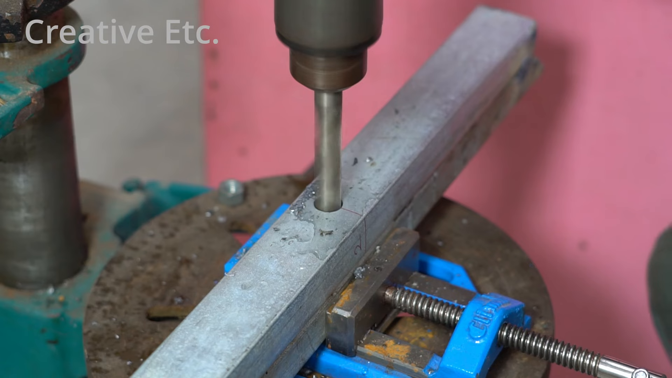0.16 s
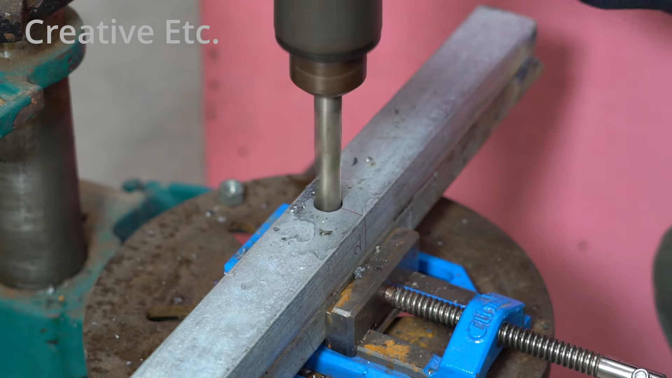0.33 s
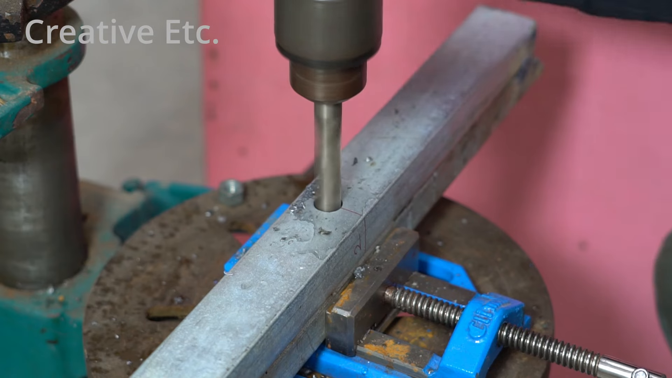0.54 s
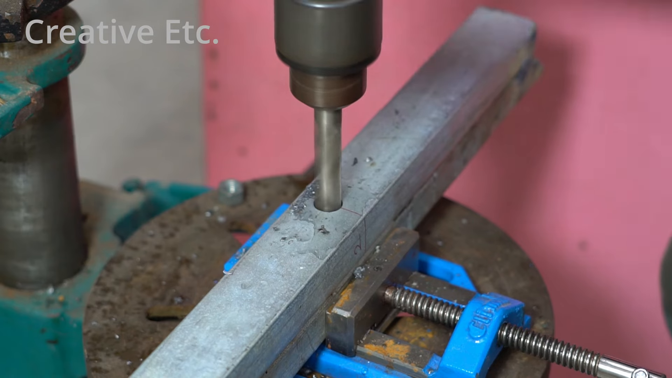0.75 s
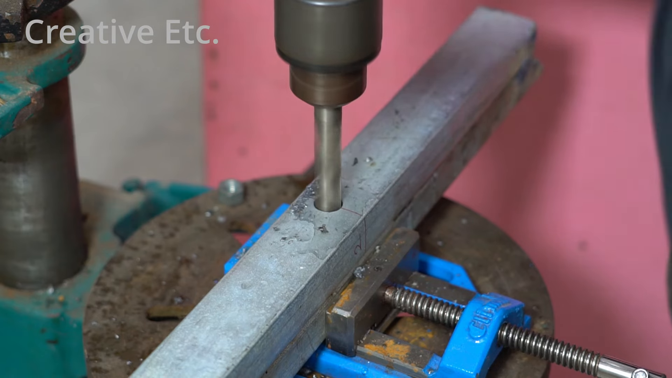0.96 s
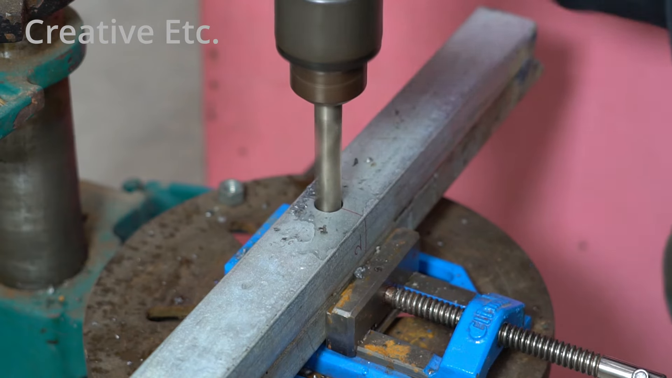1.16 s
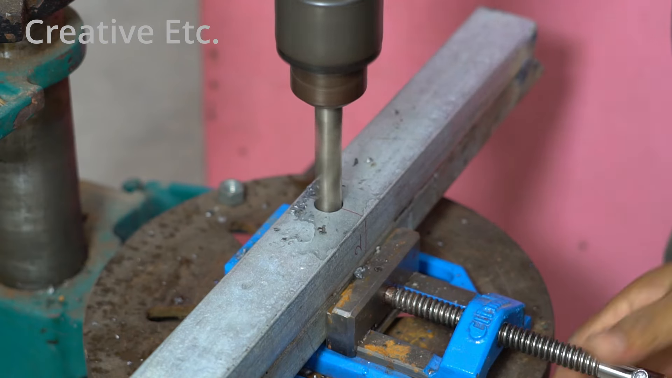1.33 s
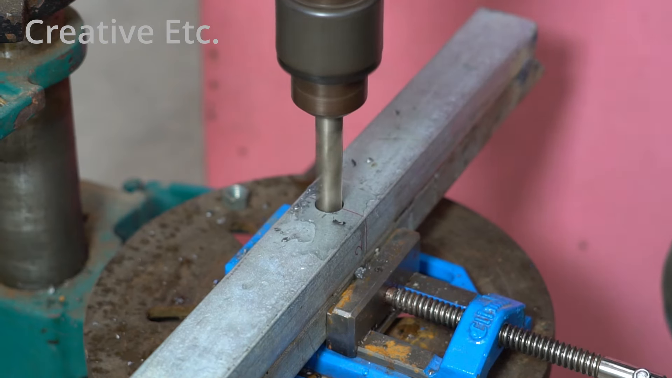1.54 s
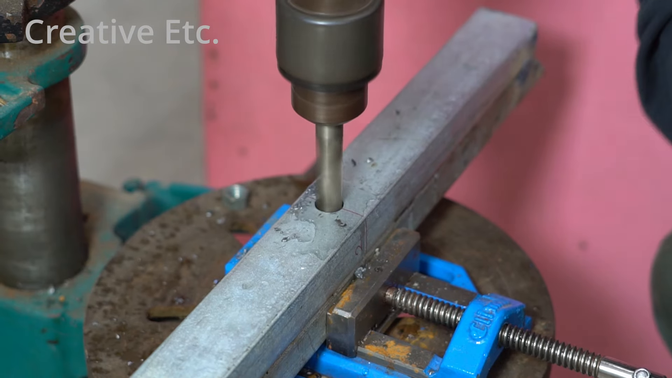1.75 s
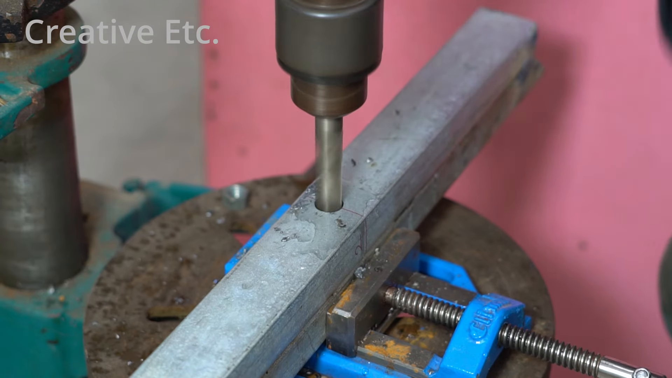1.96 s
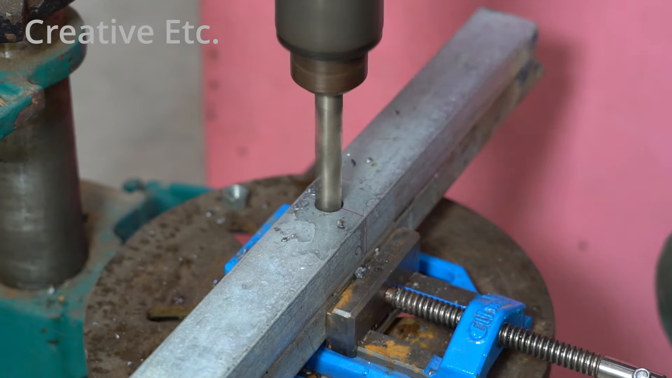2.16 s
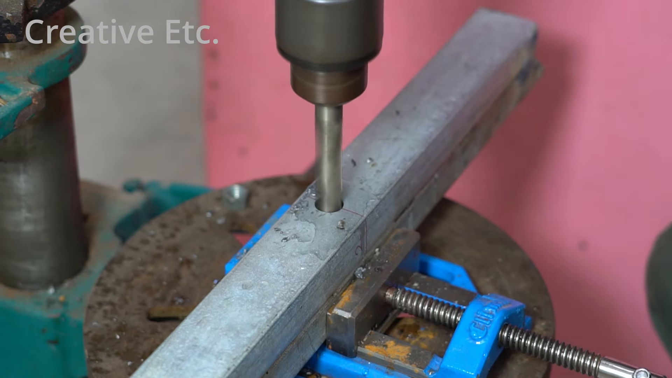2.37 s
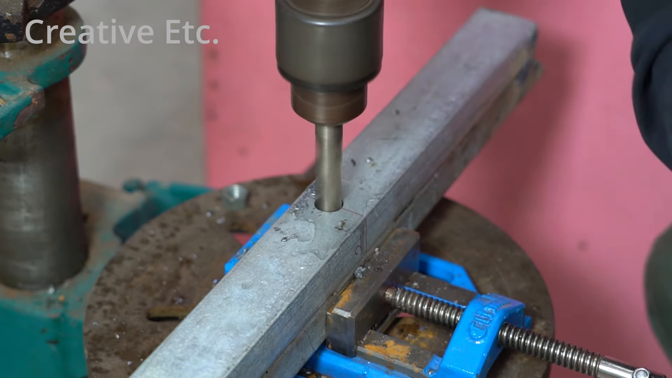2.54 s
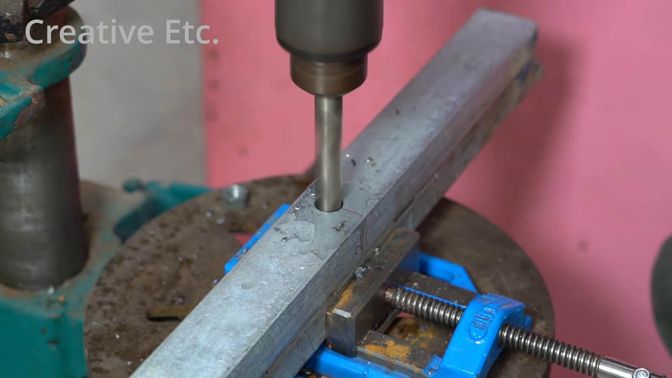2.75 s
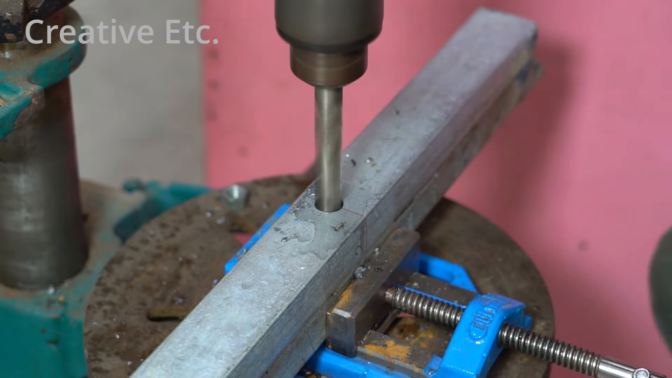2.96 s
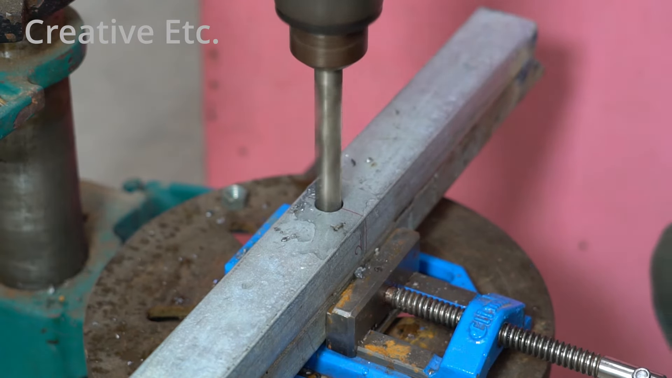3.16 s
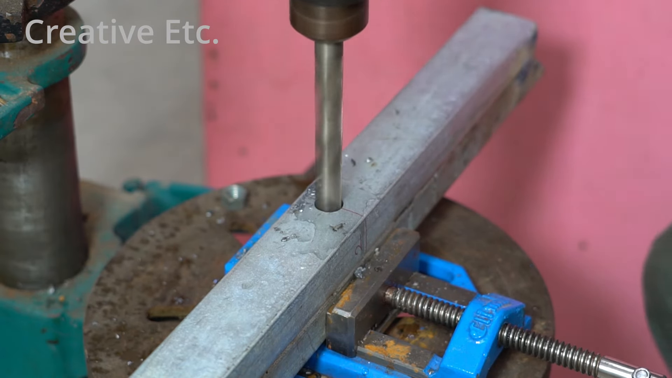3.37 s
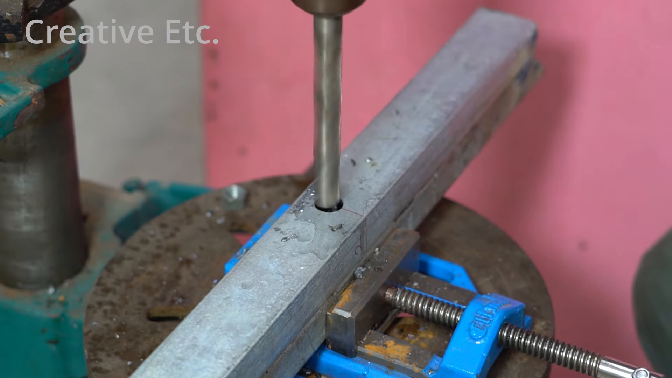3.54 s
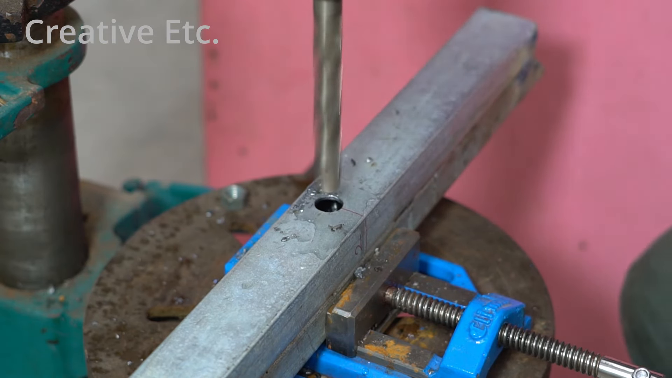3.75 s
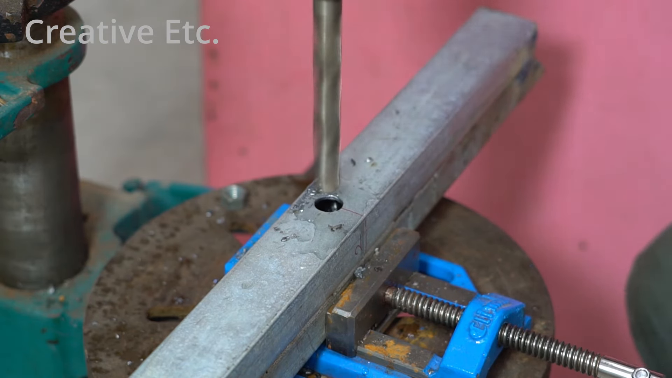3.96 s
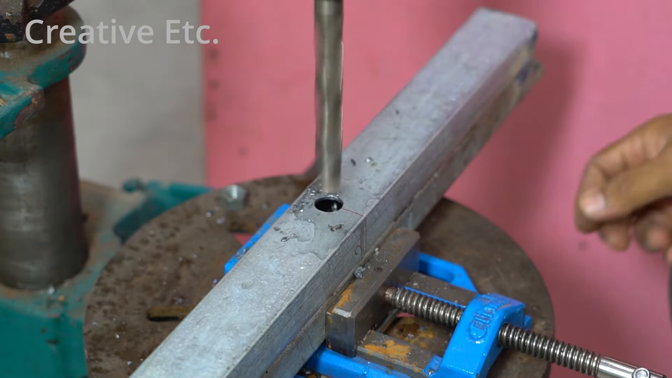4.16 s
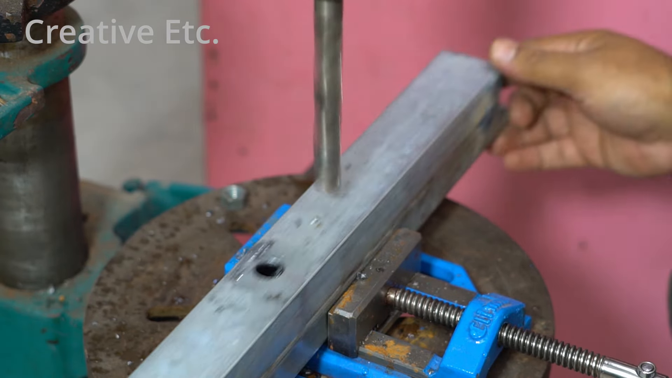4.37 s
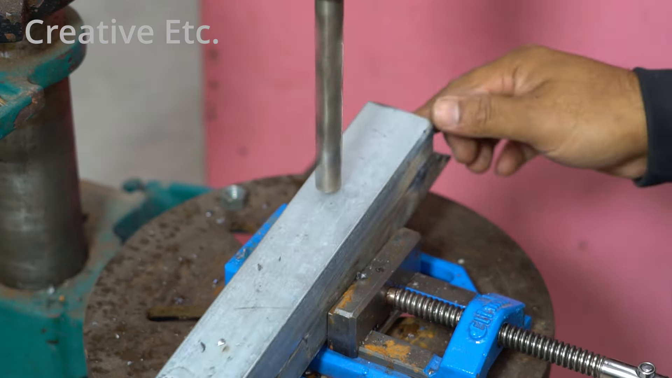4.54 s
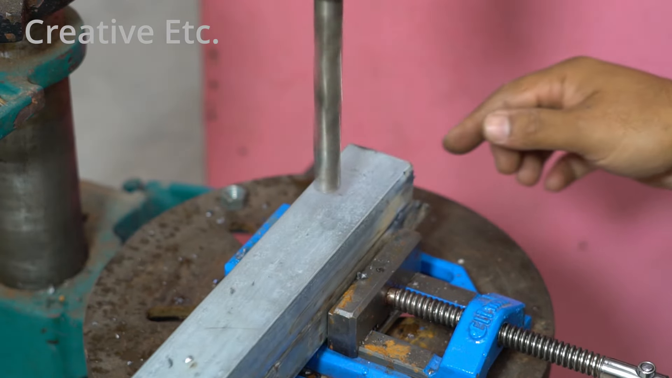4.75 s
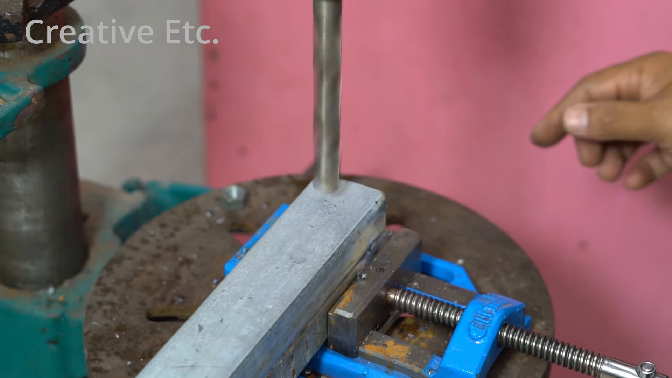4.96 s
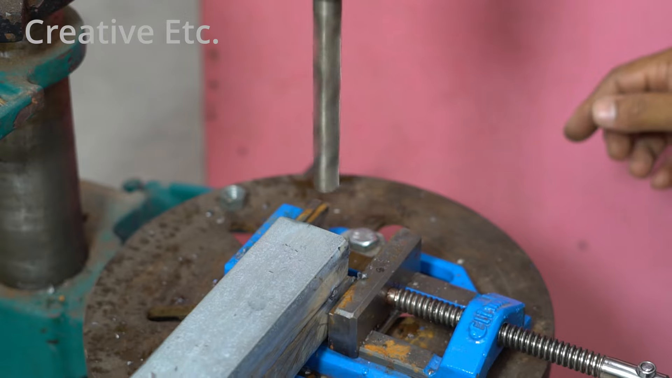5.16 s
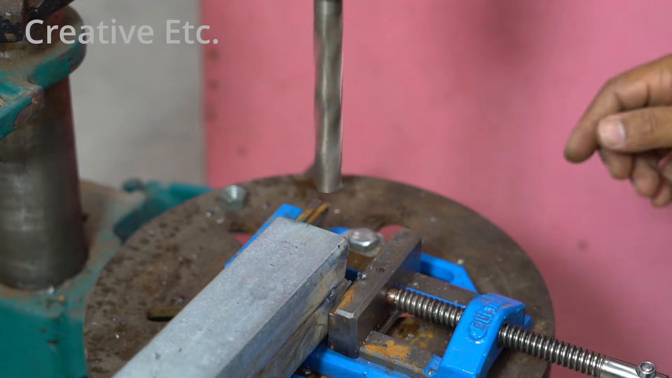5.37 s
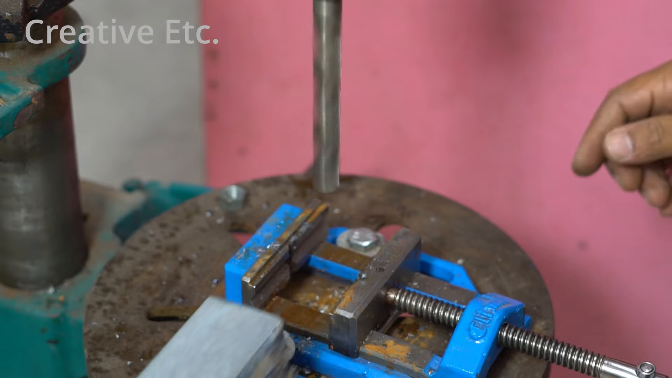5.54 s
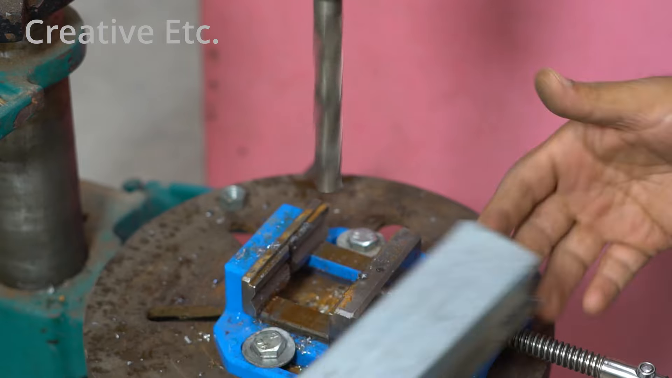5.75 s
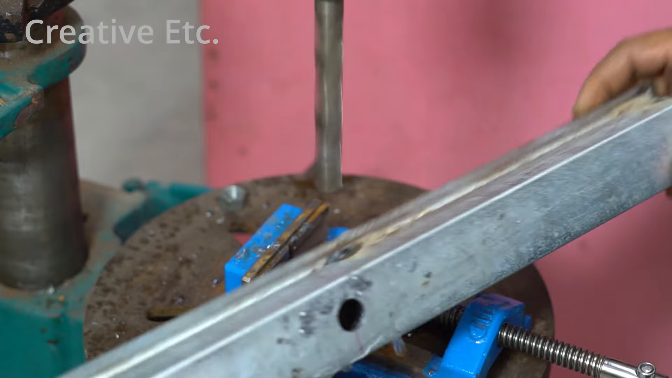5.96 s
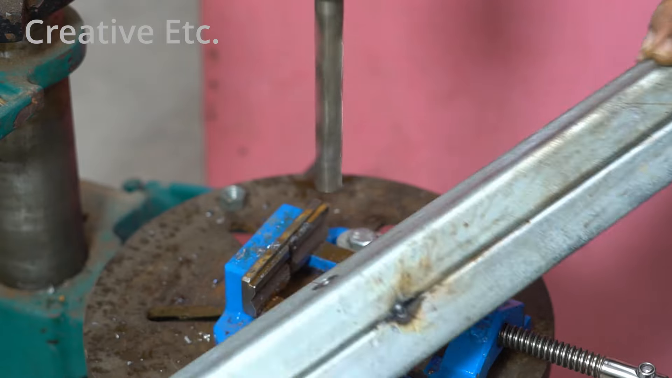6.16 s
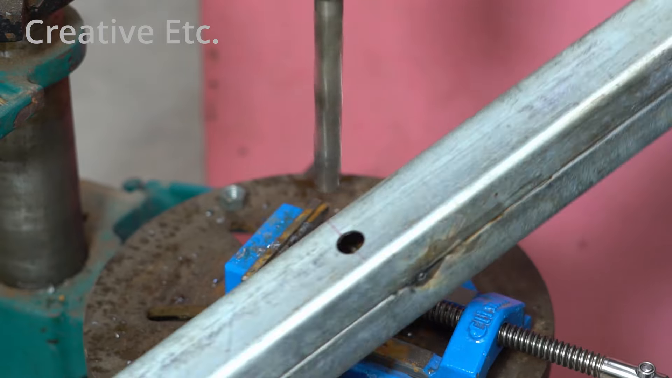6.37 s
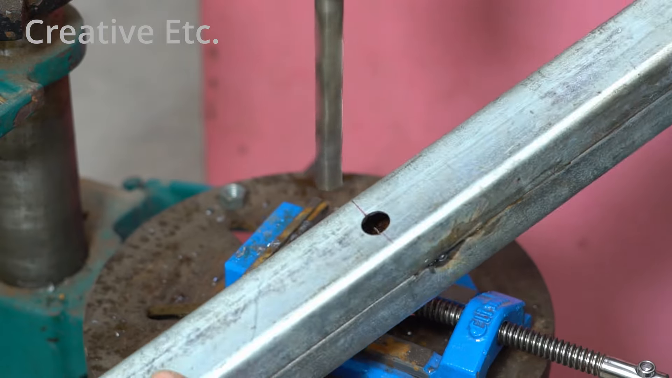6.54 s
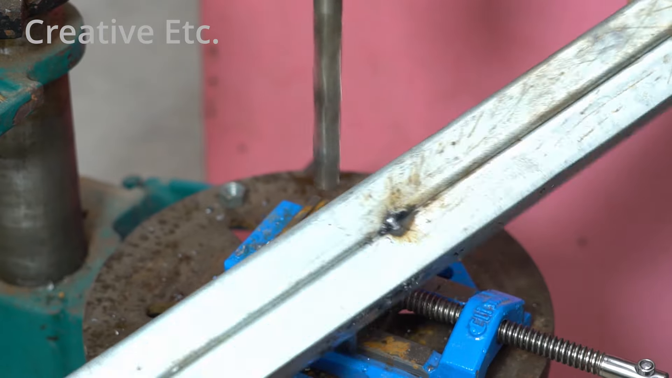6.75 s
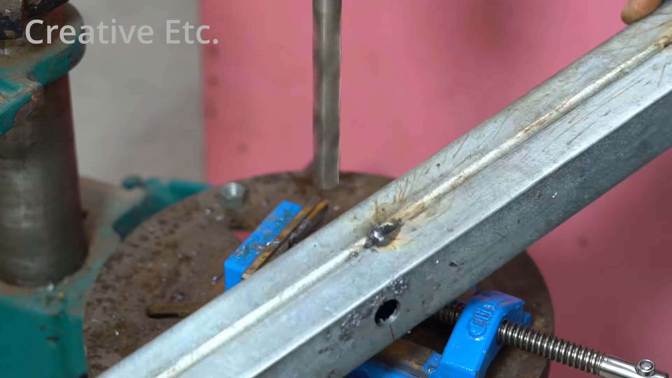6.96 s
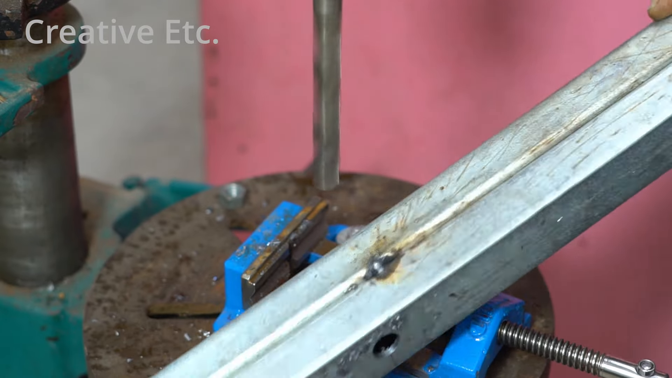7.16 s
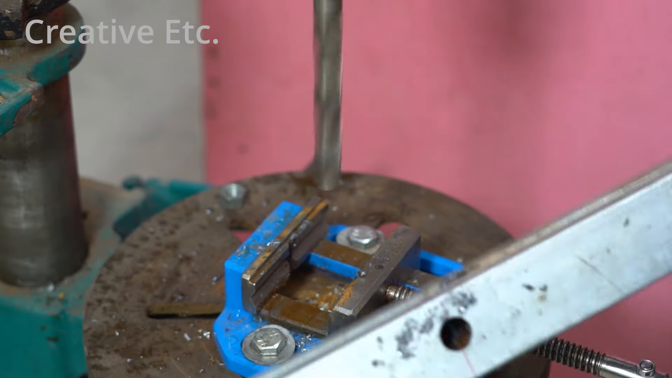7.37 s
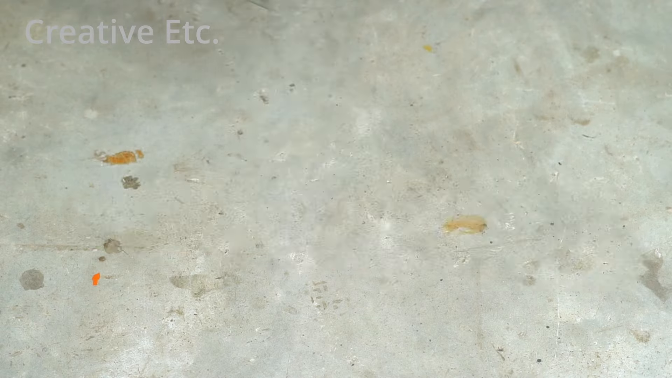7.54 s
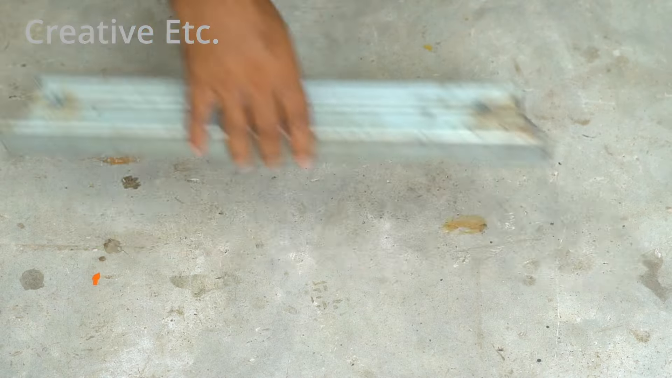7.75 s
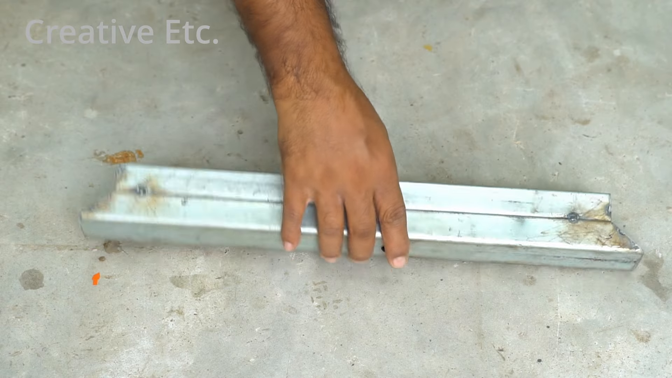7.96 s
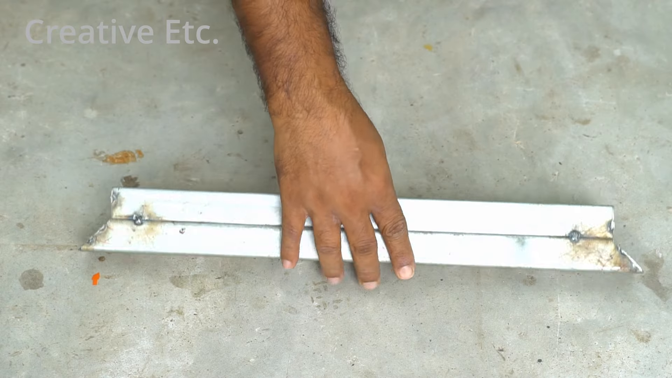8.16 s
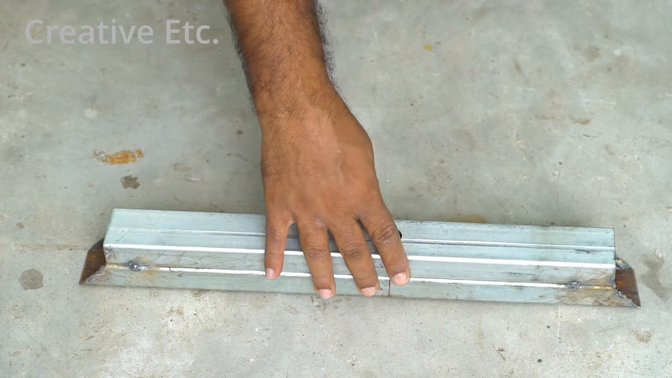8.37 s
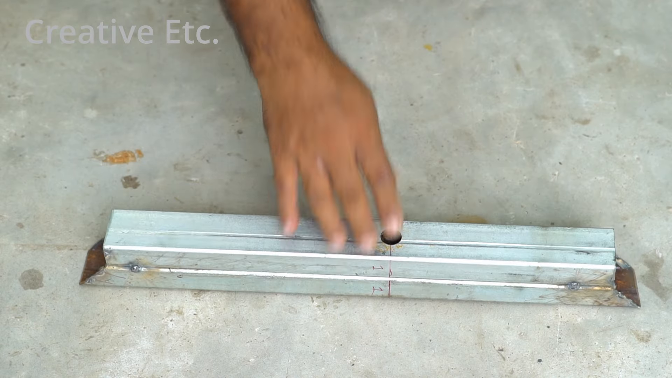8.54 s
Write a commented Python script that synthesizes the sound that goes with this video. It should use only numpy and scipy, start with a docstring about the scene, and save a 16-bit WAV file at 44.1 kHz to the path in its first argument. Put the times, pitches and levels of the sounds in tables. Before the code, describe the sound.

A bench drill press hums and rattles in a hard-walled workshop while its bit grinds through a steel tube with crackling chips and brief squeals. The grinding ends and the drill runs free as the tube scrapes and knocks against the vice. The machine cuts off abruptly. In the quiet, soft puffs of air hit the stereo microphones and the tube clanks onto concrete close by, tipping over with a short skid.

```python
"""A bench drill press in a hard-walled workshop, heard on a stereo pair of microphones.
From the start the spindle rattles once per pulley turn over motor hum and belt flap, while the bit
grinds and squeals through a steel tube. The bit lifts out at 3.75 s; the tube then scrapes and knocks
on the vice. At 7.5 s the drill cuts off abruptly, leaving quiet room air. The tube swings down, puffing
air at the microphones, is laid on the concrete floor close by and tips onto its side with a skid."""
import sys
import numpy as np
from scipy import signal
from scipy.fft import rfft, irfft, next_fast_len
from scipy.io import wavfile
from scipy.ndimage import uniform_filter1d

SR = 44100
rng = np.random.default_rng(int(sys.argv[2]) if len(sys.argv) > 2 else 0)


def pcm_store(signal):
    """Save signal as 16-bit PCM."""
    levels = np.round(np.clip(np.atleast_2d(signal), -1, 1) * 32767)
    wavfile.write(sys.argv[1], SR, levels.astype(np.int16).T)


N = 379701
T = np.arange(N) / SR
FFT_SIZE = next_fast_len(N + SR)
HZ = np.maximum(np.arange(FFT_SIZE // 2 + 1) * SR / FFT_SIZE, 1)

TURN_HZ, STOP_S, TOP_HZ = 39.4, 7.535, 15900
ROOM_T60_S, TREBLE_T60_S = 0.76, 0.26
IDLE_DB, BODY_DB, BELT_DB = -33.5, -37, -53.5  # spindle rattle, frame midrange, drive belt

# The frame's low rumble. Each row: time in seconds, relative level in dB.
RUMBLE_LEVEL = [(0.0, -34), (0.25, -36.5), (0.31, -36), (0.45, -35), (0.62, -36), (0.77, -31.5),
                (1.0, -34.5), (1.36, -33), (1.58, -53), (1.85, -41.5), (2.05, -38), (2.6, -36.5),
                (2.85, -33), (3.1, -36.5), (3.5, -34.5), (3.8, -36.5), (5.6, -37), (7.5, -38)]
# Broad colour of the running machine. Each row: frequency in Hz, gain in dB.
MACHINE_COLOUR = [(60, -46), (150, -21), (300, -20), (360, -12), (410, 0), (490, 0), (570, -7), (650, -3),
                  (820, -7), (1100, -4.5), (1600, -5), (2100, -2.5), (4000, -6.5), (5500, -11.3),
                  (7000, -15), (8700, -17), (11000, -24.5), (16000, -31.5)]
# Resonances of the cast frame. Each row: frequency in Hz, width in Hz, gain in dB.
FRAME_RESONANCES = [(401, 27, -0.5), (817, 53, -0.5), (1361, 15, -1), (1456, 18, 4.5), (1596, 18, 7),
                    (1770, 40, -1), (2940, 32, -17), (3130, 22, -4.5), (3580, 57, -2.5), (3916, 41, -5),
                    (4104, 44, 2), (6960, 39, -13), (9230, 70, -21.5)]
# The frame's low drone. Each row: frequency in Hz, width in Hz, gain in dB.
DRONE_RESONANCES = [(406, 7.9, 2.5), (466, 13, -4.5)]
# Spread of the low end across the pair. Each row: time in seconds, side over middle in dB.
STEREO_WIDTH = [(0.0, -5), (0.21, 20), (0.3, -13), (0.6, 0), (0.85, 3), (0.93, 27), (1.0, -15), (1.14, 22),
                (1.38, -7), (2.15, 2.5), (2.53, -9), (2.66, -2), (3.6, 2), (3.79, 14), (3.87, 1), (4.16, 0),
                (4.24, 21), (4.3, 0), (4.52, 8), (4.68, -5), (4.74, 16), (4.8, -9), (4.92, 9), (5.33, 1),
                (5.39, 23), (5.49, 31), (5.55, -7), (5.68, 1), (5.76, 15), (5.88, 24), (5.94, -5), (6.3, 1),
                (6.76, -3.5), (6.84, 12), (6.92, -4), (7.01, 10), (7.15, -3), (7.5, -3)]
# The spindle slowly brightens. Each row: time in seconds, treble over rattle in dB.
SPINDLE_TREBLE = [(4.6, -5.5), (6.6, -1.5)]
# Motor hum in the head casting. Each row: frequency in Hz, relative level in dB.
HUM_TONES = [(411, -4), (450, -10), (489, -8), (838, -10.5)]
# Colour of the belt's bumps. Each row: frequency in Hz, gain in dB.
BELT_COLOUR = [(20, -36.5), (50, -23.5), (95, 3.5), (140, -9), (190, -1), (260, -3), (400, -18),
               (900, -45)]
# The bit in the steel. Each row: time in seconds, cut plus rattle in dB, relative chip hiss in dB.
FEED_LEVELS = [(0.0, -17.5, -17), (0.05, -27.5, -8), (0.13, -24, -10), (0.67, -24.5, -9),
               (0.76, -20.5, -4.5), (0.96, -23.5, -12), (1.33, -25.5, -9.5), (1.49, -22, -3.5),
               (1.57, -26, 3.5), (1.63, -27, 4.5), (1.84, -32, -4.5), (2.0, -28.5, -6), (2.03, -27, -4),
               (2.13, -27.5, -11), (2.63, -23.5, -8), (3.09, -24, -9.5), (3.3, -21, -12.5),
               (3.56, -25, -7.5), (3.71, -32, -11), (3.75, -28, -2)]
# Broad colour of the grinding. Each row: frequency in Hz, gain in dB.
GRIND_COLOUR = [(350, -27), (600, -8), (1000, -17), (1600, -16), (2800, -1.5), (4200, -1.5), (6000, -2),
                (8000, 2.5), (11000, -1.5), (13500, -8), (16000, -9)]
# Resonances of bit and clamped tube. Each row: frequency in Hz, width in Hz, gain in dB.
BIT_RESONANCES = [(1460, 87, -2), (1630, 60, -5.5), (1860, 80, 0.5), (2105, 29, 0), (2307, 47, -9),
                  (2550, 30, -6), (3614, 54, -0.5), (3780, 60, -13.5), (5790, 130, -5), (9900, 410, -5.5),
                  (14540, 90, -6)]
# The largest chips snapping off. Each row: start in seconds, relative level in dB.
CHIP_SNAPS = [(0.175, -6.5), (0.7594, -13), (0.875, -2.5), (1.422, 2.5), (2.483, -2.5), (3.3444, -7),
              (3.3952, -13.5), (3.57, -7)]
# Groans and squeals of the cutting edge. Each row: start in seconds, length in seconds, pitch in Hz,
# relative level in dB, octave over fundamental in dB, roughness (0 is smooth).
EDGE_SQUEALS = [(0.1, 0.19, 1746, -39, -18, 0.86), (0.25, 0.42, 1554, -39, -15, 0.68),
                (0.268, 0.23, 439.6, -40, -17, .7), (0.602, 0.31, 1840, -37.5, -9, 0.73),
                (0.724, 0.031, 2100, -28.5, -13, 0.4), (0.75, 0.09, 3700, -35.5, -17, 0.6),
                (1.1, 0.11, 3500, -39, -13, 0.6), (1.352, 0.18, 3590, -35, -17.5, 0.5),
                (1.479, 0.056, 755, -35.5, -14, 1.1), (1.524, 0.12, 3760, -38, 3, 0.6),
                (1.62, 0.14, 3770, -35, -4, 0.35), (2.02, 0.022, 3740, -29, -6.5, 0.5),
                (2.479, 0.031, 3730, -28, -4, 0.2), (2.505, 0.081, 3740, -38, -6, 0.25),
                (2.632, 0.03, 3720, -31.5, -6, 0.48), (2.676, 0.029, 3710, -28.5, -3.5, 0.34),
                (3.13, 0.078, 3610, -39, -22, .6), (3.26, 0.23, 3635, -36.5, -24, 0.5),
                (3.49, 0.1, 1780, -34, -12, 0.67)]
# The tube slides over vice and table. Each row: start in seconds, length in seconds, relative level in dB.
TUBE_SCRAPES = [(4.203, 0.12, -43), (4.38, 0.021, -31.5), (4.546, 0.16, -38), (4.81, 0.058, -37),
                (5.203, 0.1, -36.5), (5.677, .13, -38), (6.068, .07, -34), (6.539, 0.018, -33.5),
                (6.778, 0.14, -34)]
# Colour of steel sliding on steel. Each row: frequency in Hz, gain in dB.
SCRAPE_COLOUR = [(1000, -24), (2800, -5.5), (3700, 10), (5200, -1.5), (7200, 0.5), (10000, -3.5),
                 (16000, -25)]
# The tube hits the vice. Each row: start in seconds, relative ring and crack in dB, ring cut-off in Hz.
VICE_KNOCKS = [(6.54, -36, -32, 6000), (7.066, -18, -14, 2300), (7.181, -13.5, -8, 5000),
               (7.214, -27, -22, 3500), (7.271, -36, -21, 8000)]
# Modes of the vice. Each row: frequency in Hz, relative level in dB, seconds to fall 60 dB.
VICE_MODES = [(395, -16.5, 0.22), (702, -9, 0.12), (832, -2, 0.07), (1010, -14, 0.094), (1370, -4, 0.12),
              (1447, 8, 0.16), (1540, -6.5, .14), (1650, -6.5, 0.32), (2174, -10, 0.35), (2940, -2, 0.092),
              (3003, -3, 0.39), (3540, -13, 0.14), (3920, -15, .1)]
# Colour of the crack at contact. Each row: frequency in Hz, gain in dB.
CRACK_COLOUR = [(200, -16), (420, -0.5), (800, -5), (1400, 1), (2200, -4), (3000, -3), (4500, -11),
                (7000, -19.5), (15000, -32)]
# Colour of the room tone. Each row: frequency in Hz, gain in dB.
AIR_COLOUR = [(15, -28), (25, -33), (53, -20), (103, -9.5), (462, -25), (952, -31), (1460, -30),
              (8550, -35), (15000, -54)]
# Room tone, rising with the rustle of an arm. Each row: time in seconds, level in dB.
AIR_LEVEL = [(7.56, -62.5), (7.96, -56)]
# Puffs on the microphones. Each row: start in seconds, length in seconds, level in dB.
AIR_PUFFS = [(7.65, 0.056, -46.5), (7.733, 0.047, -46.5)]
# Colour of the puffs. Each row: frequency in Hz, gain in dB.
PUFF_COLOUR = [(15, -2), (40, 3), (75, -9), (140, -19), (500, -29), (8000, -40), (15000, -70)]
# The tube lands on concrete. Each row: start in seconds, relative ring, thud and clack in dB,
# ring cut-off in Hz.
FLOOR_LANDINGS = [(7.986, -14.5, -24, -22, 4600), (8.028, -22.5, -22.5, -22, 6000),
                  (8.112, -35.5, -40.5, -43.5, 4400), (8.367, -26.5, -32, -14, 9100),
                  (8.382, -35.5, -29, -11, 9000)]
# Modes of the free tube. Each row: frequency in Hz, relative level in dB, seconds to fall 60 dB undamped.
TUBE_MODES = [(433.6, -3, 0.7), (715, -1.5, 0.27), (1036, -3, .6), (1083, -7.5, .5), (1250, -4, 0.76),
              (1490, -12, 0.56), (1646, -10.5, .5), (2088, 13, 0.29), (2164, 8.5, 0.35), (2300, 4, .22),
              (2326, 7.5, 0.38), (2460, 3.5, 0.33), (2720, 0, 0.18), (3440, -6, 0.35), (3780, 0, 0.09),
              (4040, -6, .11), (4230, -19.5, .14), (4550, -13, .13), (5440, -5, .14), (6100, -1, .07),
              (6950, -20, .6), (7600, -20.5, .2), (8400, -16, .2)]
# Colour of the slab's thud. Each row: frequency in Hz, gain in dB.
THUD_COLOUR = [(30, -15), (80, -19), (170, -2), (280, -3), (450, 2), (740, -3), (950, -10.5), (1600, -13),
               (4000, -57)]
# Colour of the clack on grit. Each row: frequency in Hz, gain in dB.
CLACK_COLOUR = [(600, -1.5), (800, -11), (960, 4.5), (1250, -4), (1480, -9), (1700, 6), (2000, 7),
                (2700, -3), (3000, 9), (3300, 3.5), (3600, 3.5), (4400, 5), (5200, 4), (6400, -11),
                (7300, -0.5), (10000, -15.5), (15000, -40.5)]
# Sound from the floor. Each row: frequency in Hz, phase between the microphones in radians.
FLOOR_PHASE = [(200, 1.4), (600, 2), (780, .2), (1000, 2.57), (1600, 2.9), (1900, 0.9), (2100, 2.1),
               (2330, .4), (2650, 3.7), (3350, 4), (3850, 1.6), (4250, 1.8), (4550, 2.2), (5300, 2.1),
               (10000, 0.73)]
# The tube's edge skids. Each row: start in seconds, length in seconds, relative level in dB.
EDGE_SKIDS = [(8.337, 0.029, -37)]
# Colour of the skid. Each row: frequency in Hz, gain in dB.
SKID_COLOUR = [(1500, -23), (4000, -6), (6700, -16), (7400, 5), (8300, -13), (11000, -18), (15000, -32)]


def undb(db):
    """Decibels to gain."""
    return 10 ** (np.asarray(db) / 20)


def unit(x):
    """Scale so that the middle of the stereo image has rms 1."""
    return x / np.std(np.atleast_2d(x).mean(axis=0))


def curves(table):
    """The columns of a table, joined by straight lines in time."""
    s, *columns = np.transpose(table)
    return [np.interp(T, s, column) for column in columns]


def shape(x, gain):
    """Filter by a gain for each frequency."""
    return irfft(rfft(np.float32(x), FFT_SIZE) * np.complex64(gain), FFT_SIZE)[..., :N]


def colour(points):
    """Gain of a broad spectrum through the given points."""
    hz, db = np.transpose(points)
    return undb(np.interp(np.log(HZ), np.log(hz), db))


def resonances(table):
    """Gain of a set of resonant peaks."""
    return np.sqrt(sum(undb(2 * db) / (1 + ((HZ - hz) / width) ** 2) ** 2 for hz, width, db in table))


def walk(per_s):
    """Smooth random wavering with a spread near 1."""
    hold = max(int(SR / per_s), 1)
    steps = np.repeat(rng.standard_normal(N // hold + 1), hold)
    return 1.248 * uniform_filter1d(steps, hold)[:N]


def ringing(x, table, flicker_db):
    """Three groups of resonances take turns in sounding as the point of contact wanders."""
    return sum(shape(x, resonances(table[k::3])) * undb(flicker_db * walk(28)) for k in range(3))


def grains(per_s, spread_db, ring_s=0.0033):
    """Random impacts, each scattering into a short crackle that differs at the two microphones."""
    size = undb(spread_db * np.minimum(rng.exponential(size=N), 4))
    hits = rng.random(N) < per_s / SR
    energy = signal.lfilter([1], [1, -np.exp(-2 / (ring_s * SR))], hits * size ** 2)
    return unit(np.sqrt(energy) * rng.standard_normal((2, N)))


def burst(s, rise_s, t60_s):
    """Envelope that builds up quickly and dies away."""
    age = T[:SR]
    envelope = np.minimum(age / rise_s, 1) * undb(-60 * age / t60_s)
    return np.pad(envelope, (int(s * SR), N))[:N]


def swells(table):
    """Envelope with one rounded swell for each row."""
    return sum(undb(db) * np.sin(np.pi * np.clip((T - s) / length_s, 0, 1)).clip(0) ** .5
               for s, length_s, db in table)


def strike(modes, s, cutoff_hz):
    """One blow rings the modes; a soft contact leaves those above the cut-off quiet."""
    hz, db, t60 = np.transpose(modes)[:, :, None]
    age = T[:SR]
    phase = rng.uniform(0, 2 * np.pi, hz.shape)
    size = undb(db) / np.hypot(1, (hz / cutoff_hz) ** 2)
    ring = (size * undb(-60 * age / t60) * np.sin(2 * np.pi * hz * age + phase)).sum(axis=0)
    return np.pad(ring * np.minimum(age / 0.0093, 1), (int(s * SR), N))[:N]


def room(x, near_s, wet_db, direct=1.65):
    """Each microphone hears scatter from things close by, then the walls, where the treble dies first."""
    age = T[:SR]
    near = rng.standard_normal((2, SR)) * np.exp(-age / near_s)
    near[:, 0] += direct * np.linalg.norm(near[0])  # more direct sound seems closer
    noise = rng.standard_normal((2, SR))
    low = signal.sosfilt(signal.butter(1, 2500, fs=SR, output="sos"), noise)
    tail = low * undb(-60 * age / ROOM_T60_S) + (noise - low) * undb(-60 * age / TREBLE_T60_S)
    tail *= np.minimum(age / 0.0039, 1)
    response = near / np.linalg.norm(near[0]) + undb(wet_db) * tail / np.linalg.norm(tail[0])
    return signal.fftconvolve(np.atleast_2d(x), response, axes=1)[:, :N]


def split(x, hz):
    """The parts below and above a frequency."""
    low = shape(x, 1 / (1 + (HZ / hz) ** 8))
    return low, x - low


def widen(x):
    """Shift a diffuse sound between the middle and the sides at constant power."""
    angle = np.arctan(undb(curves(STEREO_WIDTH)[0]))
    return np.cos(angle) * x[0] + np.sin(angle) * x[1] * np.array([[1], [-1]])


def feed_gain():
    """Strength of the cut: whatever exceeds the free-running rattle, until the bit is lifted out."""
    excess_power = undb(2 * curves(FEED_LEVELS)[0]) - undb(2 * IDLE_DB)
    return np.sqrt(np.maximum(excess_power, 0)) * (T < FEED_LEVELS[-1][0])


def spindle_rattle(turn, rumble_db):
    """Loose splines and bearings clatter at every pulley turn and ring the frame, harder under load."""
    force = undb(1.1 * np.cos(turn) + 0.16 * np.cos(2 * turn) + 0.23 * walk(70))
    clatter = room(grains(2000, spread_db=3, ring_s=0.007) * force, near_s=0.0032, wet_db=-5)
    frame = shape(clatter, colour(MACHINE_COLOUR))
    frame += undb(-6) * ringing(clatter, FRAME_RESONANCES, flicker_db=3.5)
    frame += undb(-7) * shape(clatter, resonances(DRONE_RESONANCES))
    rumble, upper = split(frame, hz=548)
    body, upper = split(upper, hz=1216)
    rattle, treble = split(upper, hz=5030)
    feed = feed_gain()
    load_db = 1.2 * feed / feed.max()
    body_db = BODY_DB + 0.9 * (rumble_db - rumble_db.mean()) + load_db + 0.72 * walk(13)
    low = widen(unit(rumble)) * undb(rumble_db - 3) + unit(body) * undb(body_db)
    high = unit(rattle) + unit(treble) * undb(curves(SPINDLE_TREBLE)[0])
    return low + high * undb(IDLE_DB + 0.57 * walk(22))


def motor_hum(rumble_db):
    """The motor drones through the head casting, throbbing as the belt tugs."""
    def drone(wander=0.012, throb_db=4):
        motor_time = np.cumsum(1 + wander * walk(45)) / SR
        tones = 0
        for hz, db in HUM_TONES:
            gain = undb(db + throb_db * np.tanh(walk(14)))
            tones += gain * np.sin(2 * np.pi * (hz * motor_time + rng.random()))
        return unit(tones)
    return widen([drone(), undb(-0.5) * drone()]) * undb(rumble_db - 1.5)


def belt_flap(rumble_db, swing_db=7):
    """The slack belt flaps unevenly and bumps the head casting, sinking when the frame's rumble dips."""
    dip_db = 0.9 * np.minimum(rumble_db - rumble_db.mean(), 0)
    level_db = BELT_DB + dip_db + swing_db * np.tanh(walk(10))
    bumps = shape(grains(45, spread_db=0, ring_s=0.014), colour(BELT_COLOUR))
    return widen(unit(bumps)) * undb(level_db)


def bit_grinding(turn):
    """The lips tear off chips: a surging crackle that rings bit and tube, and a few loud snaps."""
    chatter = undb(1.7 * np.cos(turn) + 1.1 * walk(90))
    tearing = room(grains(2400, spread_db=2, ring_s=0.0055) * chatter, near_s=0.0033, wet_db=-5.5)
    ring = undb(-0.5) * ringing(tearing, BIT_RESONANCES, flicker_db=3)
    grind, hiss = split(shape(tearing, colour(GRIND_COLOUR)) + ring, hz=5960)
    hiss_db = curves(FEED_LEVELS)[1]
    cut = unit(grind) * undb(-1) + unit(hiss) * undb(hiss_db - 2)
    snaps = sum(undb(db) * burst(s, 0.0053, 0.025) for s, db in CHIP_SNAPS) * rng.standard_normal(N)
    snaps = shape(room(snaps, near_s=0.0013, wet_db=0), colour(GRIND_COLOUR) ** 0.9)
    return feed_gain() * cut + undb(-3.5) * snaps


def chip_pings(per_s=160, low_hz=1300, high_hz=4400, t60_s=0.035):
    """Chips and edges catch and ring briefly, each at its own pitch, as long as the bit is cutting."""
    pings, age = np.zeros(N + SR), T[:int(t60_s * SR)]
    envelope = np.minimum(age / .005, 1) * undb(-60 * age / t60_s)
    for when, pitch, size in rng.random((int(per_s * N / SR), 3)):
        start = int(when * N)
        hz = low_hz * (high_hz / low_hz) ** pitch
        pings[start:start + len(age)] += size * envelope * np.sin(2 * np.pi * hz * age)
    return unit(room(pings[:N], near_s=0.0022, wet_db=-8, direct=0.88)) * feed_gain() * undb(-9)


def bit_squeal():
    """The edge sticks and slips at the bit's twisting resonances: a stuttering, rasping whistle."""
    whistle = np.zeros(N)
    waver = .018 * walk(60) + .055 * walk(900)  # the pitch wanders slowly and trembles fast
    rasp = undb(-3) * walk(1100)
    for s, length_s, hz, db, octave_db, rough in EDGE_SQUEALS:
        span = slice(int(s * SR), int((s + length_s) * SR))
        phase = 2 * np.pi * hz * np.cumsum(1 + rough * waver[span]) / SR
        tone = np.sin(phase) + undb(octave_db) * (np.sin(2 * phase) + undb(-7.5) * np.sin(3 * phase))
        envelope = undb(db + 7.5) * np.hanning(len(phase)) ** 0.24
        whistle[span] += envelope * tone * (1 + rough * rasp[span])
    stutter = undb(4.1 * np.tanh(walk(200)))
    return room(whistle * stutter, near_s=0.0015, wet_db=-5)


def tube_scrapes():
    """The tube drags over the jaws in short, catching slides, with little of the walls in the sound."""
    contact = swells(TUBE_SCRAPES) * undb(3.2 * walk(70))
    friction = unit(shape(grains(900, spread_db=4), colour(SCRAPE_COLOUR)))
    return room(contact * friction, near_s=0.0017, wet_db=-16.5)


def vice_knocks():
    """The tube bumps the vice as it is turned over, and chatters briefly."""
    ring, contact = 0, 0
    for s, ring_db, crack_db, cutoff_hz in VICE_KNOCKS:
        ring += undb(ring_db) * strike(VICE_MODES, s, cutoff_hz) * (0.42 + burst(s, .001, 0.074))
        contact += undb(crack_db) * burst(s, 0.0024, 0.085)
    crack = undb(2) * shape(contact * rng.standard_normal(N), colour(CRACK_COLOUR))
    return room(ring + crack, near_s=0.0026, wet_db=-10, direct=2.2)


def room_tone():
    """Quiet workshop air, uncovered when the drill cuts off; it rises as an arm rustles."""
    air = unit(shape(rng.standard_normal((2, N)), colour(AIR_COLOUR)))
    return air * undb(curves(AIR_LEVEL)[0] + walk(30))


def microphone_puffs():
    """The tube swings down and pushes soft, low puffs of air right onto the microphones."""
    return unit(shape(rng.standard_normal((2, N)), colour(PUFF_COLOUR))) * swells(AIR_PUFFS)


def tube_on_floor(grit_per_s=7500):
    """Close by, edges land in turn: the slab thuds, grit cracks, and the hand damps the ringing tube."""
    ring, thud, clack = 0, 0, 0
    for s, ring_db, thud_db, clack_db, cutoff_hz in FLOOR_LANDINGS:
        hand_damping = 0.055 + 1.2 * burst(s, .001, 0.05)
        ring += undb(ring_db) * strike(TUBE_MODES, s, cutoff_hz) * hand_damping
        thud += undb(thud_db + 12.5) * burst(s - .008, 0.013, 0.07)
        clack += undb(clack_db + 5.5) * burst(s - .001, 0.0058, 0.045)
    thud *= unit(shape(grains(grit_per_s, spread_db=1)[0], colour(THUD_COLOUR)))
    tube_wall = 0.45 + resonances([(hz, 40, 0) for hz, _, _ in TUBE_MODES])
    clack *= unit(shape(grains(grit_per_s, spread_db=1)[0], colour(CLACK_COLOUR) * tube_wall))
    phase = np.interp(HZ, *np.transpose(FLOOR_PHASE))
    pair = shape(ring + thud + clack, np.exp(.5j * phase * np.array([[1], [-1]])))
    return room(pair, near_s=0.0067, wet_db=-10.5, direct=5.5)


def tube_skid():
    """The tipping tube's edge chirps over the grit."""
    friction = unit(shape(grains(3000, spread_db=2)[0], colour(SKID_COLOUR)))
    return room(swells(EDGE_SKIDS) * friction, near_s=0.002, wet_db=-9)


def scene():
    """At the microphones: the work at the bench, then the tube on the floor of the quiet room."""
    turn = 2 * np.pi * np.cumsum(TURN_HZ * (1 + 0.01 * walk(2.95))) / SR  # pulley angle in radians
    rumble_db = curves(RUMBLE_LEVEL)[0] + 3.5 * np.tanh(walk(15))
    machine = spindle_rattle(turn, rumble_db) + motor_hum(rumble_db) + belt_flap(rumble_db)
    drilling = bit_grinding(turn) + chip_pings() + bit_squeal()
    bench = machine + drilling + tube_scrapes() + vice_knocks()
    running = np.clip((STOP_S - T) / .003, 0, 1)
    lean_left = undb([[.2], [-.2]])
    floor = tube_on_floor() + tube_skid()
    return bench * running * lean_left + room_tone() + microphone_puffs() + floor


def record(dry):
    """The recorder cuts the top treble steeply."""
    return signal.sosfilt(signal.ellip(10, .2, 80, TOP_HZ, fs=SR, output="sos"), dry)


dry = scene()
out = record(dry)
pcm_store(out)
```